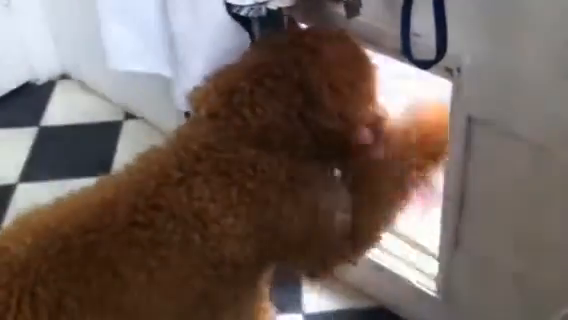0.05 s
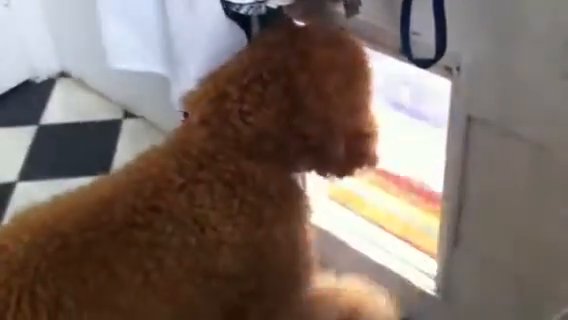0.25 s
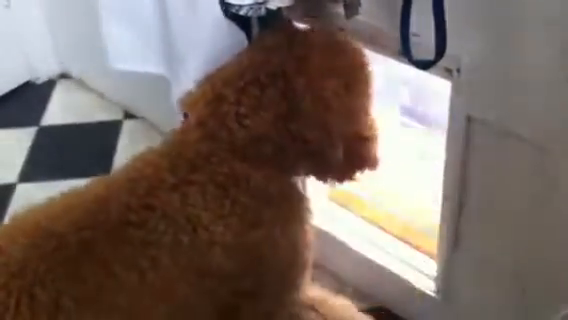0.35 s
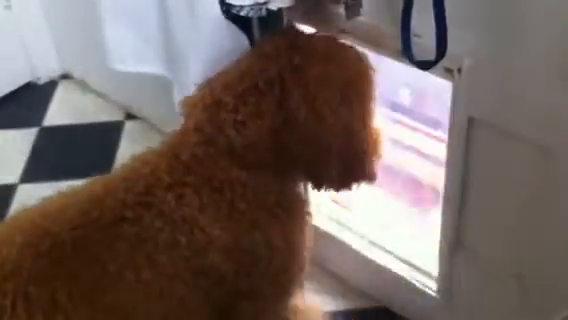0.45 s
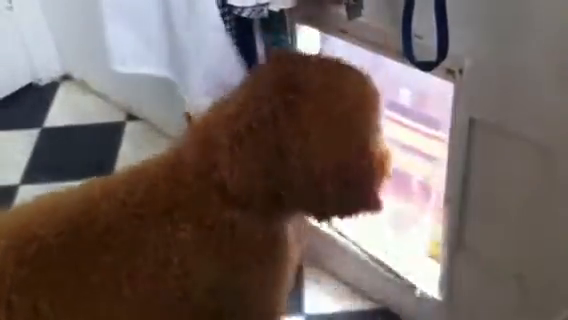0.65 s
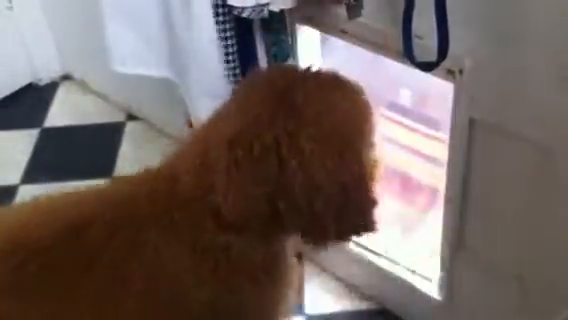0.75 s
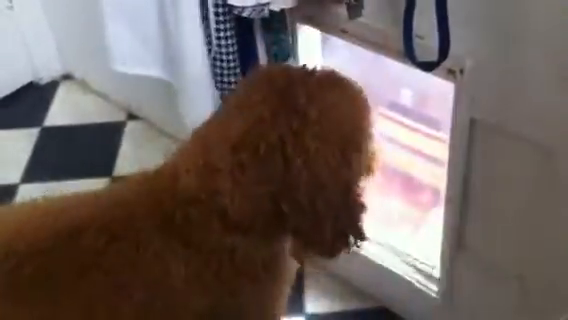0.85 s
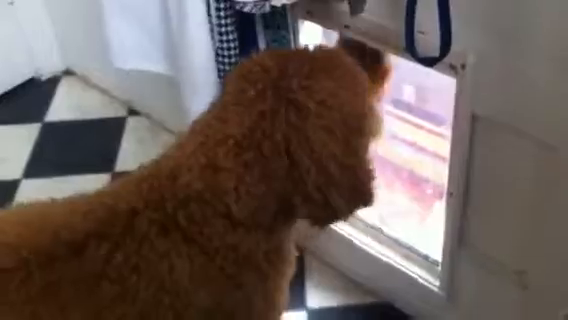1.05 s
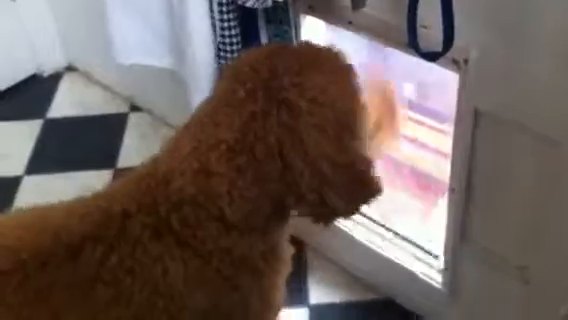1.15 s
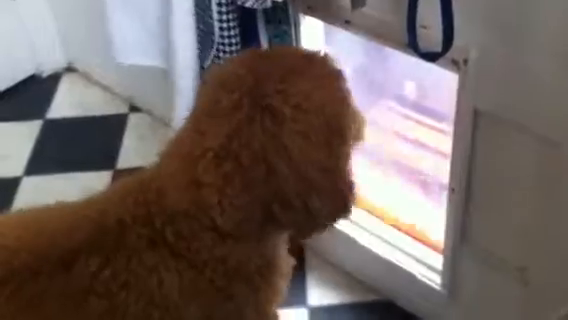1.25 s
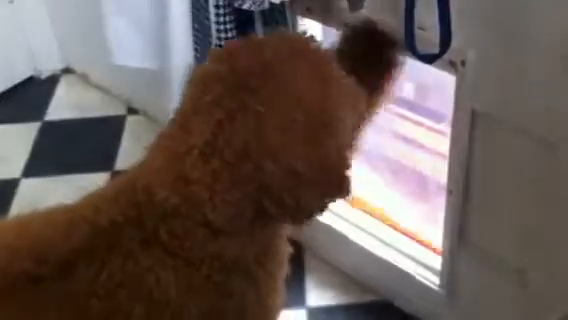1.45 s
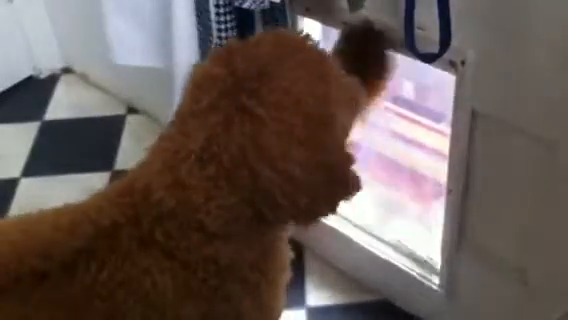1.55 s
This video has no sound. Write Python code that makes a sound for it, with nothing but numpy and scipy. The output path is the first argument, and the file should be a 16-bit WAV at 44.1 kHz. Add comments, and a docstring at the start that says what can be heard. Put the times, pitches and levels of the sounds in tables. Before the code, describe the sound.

A dog's paw strikes a plastic pet-door flap, close up in a small tiled room. Faint taps and scratching begin at once, a soft brush and clatter come near 0.2 s, and the sharpest clack at 0.35 s. After a pause, rattling clusters with claw drags follow at 0.63-0.8, 1.03-1.13 and 1.31-1.41 s, then a clack at 1.58 s. Faint low hum lies underneath.

```python
"""A plastic pet-door flap is pawed by a dog in a small, quiet, tiled room.
Each swipe is a cluster of knocks: the claws click, the flap clacks and rattles, its panel rings, the door thuds.
Clicks, clacks and rattles are short bursts of filtered noise; the panel and the door are fading sine waves.
Around the knocks the claws drag over the plastic (random ticks) and the furry paw brushes it (soft noise).
The room adds dense reflections, and steady noise with a faint hum of two sine waves lies underneath."""
import sys
import numpy as np
from scipy import signal
from scipy.fft import rfft, irfft
from scipy.io import wavfile
from scipy.ndimage import uniform_filter1d

SR = 44100
rng = np.random.default_rng(int(sys.argv[2]) if len(sys.argv) > 2 else 0)


def to_wav(sig):
    """Store sig (one row per channel, or 1-D mono) as 16-bit WAV at the path in sys.argv[1].

    Samples outside -1..1 are clipped; the rate is SR.
    """
    pcm = np.clip(np.atleast_2d(sig), -1, 1) * 32767
    pcm = np.round(pcm).astype(np.int16)
    wavfile.write(sys.argv[1], SR, pcm.T)  # frames by channels


N = 70560
T = np.arange(N) / SR


def from_db(db):
    """Turn decibels into a gain."""
    return 10 ** (np.asarray(db) / 20)


def unit(x):
    """Scale a sound so that its squared samples add up to one."""
    return x / np.sqrt(np.sum(x ** 2) + 1e-20)


def at_hz(points, hz):
    """Read between the points of a table, with frequency on a log scale."""
    point_hz, values = np.transpose(points)
    return np.interp(np.log(np.maximum(hz, 1)), np.log(point_hz), values)


def colour(x, points, even=False):
    """Filter by a table, without sound ahead of its cause; even also smooths out the input's own broad colour."""
    size = 2 * len(x)
    spectrum = rfft(x, size)
    gain = from_db(at_hz(points, np.fft.rfftfreq(size, 1 / SR)))
    if even:
        smooth_power = uniform_filter1d(np.abs(spectrum) ** 2, size=120)
        gain = gain / np.sqrt(smooth_power + 1e-12)
    # Folding the cepstrum gives the minimum-phase filter, which responds as early as it can
    cepstrum = irfft(np.log(gain))
    cepstrum[1:size // 2] *= 2
    cepstrum[size // 2 + 1:] = 0
    return irfft(spectrum * np.exp(rfft(cepstrum)))[:len(x)]


def add(out, start_s, x):
    """Mix x into out from a given time, cut off at the end."""
    i = max(int(start_s * SR), 0)
    out[i:i + len(x)] += x[:max(N - i, 0)]


def ring(modes, build_ms, spread_db=3.0, size=9000):
    """A struck object rings at several pitches (modes); each blow varies their strength and tuning."""
    hz, db, t60 = np.transpose(modes)[:, :, None]
    t = T[:size]
    strength = db + spread_db * rng.standard_normal(hz.shape)
    detune = 0.008  # typical fraction: the paw loads the flap differently at each blow
    hz = hz * (1 + detune * rng.standard_normal(hz.shape))
    waves = np.sin(2 * np.pi * (hz * t + rng.random(hz.shape)))
    fade = np.exp(-np.log(1000) * t / t60)  # down by 60 dB after t60
    modes_sum = (from_db(strength) * fade * waves).sum(0)
    build = 1 - np.exp(-t * 1000 / build_ms)  # the object takes up the blow gradually
    return unit(modes_sum * build)


def chatter(decay_ms, points, size=4096):
    """Hard plastic in contact: tiny impacts, made as a noise burst that dies in milliseconds."""
    rise_ms, shortest_ms = 0.47, 0.3
    t_ms = T[:size] * 1000
    fade = np.exp(-t_ms / max(decay_ms, shortest_ms))
    rise = 1 - np.exp(-t_ms / rise_ms)
    burst = rng.standard_normal(size) * fade * rise
    return unit(colour(burst, points, even=True))


def thin(x):
    """Take out the bass, since hard little contacts radiate none."""
    return signal.sosfilt(signal.butter(2, 940, "high", fs=SR, output="sos"), x)


def resonate(x, hz):
    """The spot that is struck favours one resonance, so lift a narrow band there."""
    lift_db, width_hz = 9.5, 160
    b, a = signal.iirpeak(hz, hz / width_hz, fs=SR)
    peak = signal.lfilter(b, a, x)
    return unit(x + (from_db(lift_db) - 1) * peak)


# Colour of the quiet room noise: (f/Hz, relative level/dB)
NOISE_COLOUR = [(25, -13), (60, -10.5), (130, 3.5), (220, 8), (350, 0), (600, -3.5), (1000, -9),
                (2500, -12), (5000, -17.5), (16000, -19.5)]
# Steady hum tones: (f/Hz, level/dB)
HUM_TONES = [(134, -80), (221, -70.5)]


def background():
    """Faint room noise is filtered random noise; the low hum is steady sine waves."""
    hum = 0
    for hz, db in HUM_TONES:
        tone = np.sin(2 * np.pi * (hz * T + rng.random()))
        hum = hum + from_db(db) * np.sqrt(2) * tone  # the root of 2 makes the level an RMS level
    noise_db = -65
    noise = unit(colour(rng.standard_normal(N), NOISE_COLOUR)) * np.sqrt(N)
    return hum + from_db(noise_db) * noise


# Ringing pitches of the door, before each blow varies them: (f/Hz, relative level/dB, time to fade by 60 dB t/s)
DOOR_MODES = [(55, -11, 0.025), (137.4, -4.5, 0.1), (175, -1, 0.055), (224.8, -4.5, 0.15),
              (290.6, 0.5, 0.14), (324, -2, 0.15), (370, 2.5, .06)]


def door_thud():
    """The door takes up the blow and rings low and briefly."""
    return ring(DOOR_MODES, build_ms=4.3)


# Ringing pitches of the plastic panel, likewise: (f/Hz, relative level/dB, time to fade by 60 dB t/s)
PANEL_MODES = [(480.6, -7.5, 0.12), (550.2, -3, 0.23), (589.4, 2.5, 0.097), (640, -3, .08),
               (714.3, -4, 0.25), (854, -9.5, .08), (1161.7, -0.5, 0.08), (1236, -14.5, 0.052),
               (1625, -6.5, .16), (1786, -5, 0.076), (1908, -7.5, 0.13), (2090, -6, .15)]


def panel_ring():
    """The plastic panel takes up the blow and rings at its own pitches."""
    return ring(PANEL_MODES, build_ms=3.4)


# Colour of the rattle: (f/Hz, relative level/dB)
RATTLE_COLOUR = [(250, -29.5), (550, 2), (850, -0.5), (980, -3.5), (1170, 0.5), (1450, -1), (1800, -7),
                 (2400, -32.5)]


def rattle(decay_ms):
    """The flap rattles: the lowest and longest chatter of a knock."""
    return chatter(decay_ms * 3.8, RATTLE_COLOUR)


# Colour of the clack before its resonance is lifted: (f/Hz, relative level/dB)
CLACK_COLOUR = [(1200, -26.5), (1700, -0.5), (2050, -0.5), (2350, 0.5), (2750, 0.5), (3150, 0),
                (3700, -4.5), (4500, -9), (6500, -27.5)]


def clack(decay_ms, hz):
    """The flap clacks in its frame: short chatter with the struck spot's resonance."""
    return thin(resonate(chatter(decay_ms * 1.2, CLACK_COLOUR), hz))


# Colour of the claw click: (f/Hz, relative level/dB)
CLICK_COLOUR = [(2800, -6.5), (4000, -2), (5200, -4.5), (6200, 1), (7300, -1.5), (9000, 3), (11000, -5),
                (13100, 1.5), (14500, -8.5), (16000, -2)]


def claw_click(decay_ms):
    """Hard claws hit the plastic: the brightest and shortest chatter."""
    return thin(chatter(decay_ms, CLICK_COLOUR))


# Knocks on the flap; each level is what the part's energy gives when spread over 5 ms, before thinning.
# The decay is a base time, stretched for clack and rattle.
# (t/s, base chatter decay t/ms, door thud level/dB, panel ring level/dB, rattle level/dB,
#  clack level/dB, clack resonance f/Hz, claw click level/dB)
FLAP_KNOCKS = [ (0.0366, 4.7, -55, -55.5, -45.5, -41.5, 2510, -49.5),
               (.0657, 3.1, -44.5, -50, -45.5, -47, 2540, -46.5),
               (.0720, 5.6, -46, -74, -55, -54, 3100, -46), (0.081, 2.3, -65, -46.5, -53.5, -51, 2680, -52),
               (.1230, 5.1, -44.5, -48, -53.5, -50.5, 3100, -58),
               (.2150, 8.5, -58, -37, -33, -34.5, 2410, -47),
               (.2182, 2.4, -64, -34, -32.5, -35.5, 2720, -34.5),
               (.2370, 4.0, -50, -67, -57, -40.5, 2950, -46), (0.2571, 2.0, -54, -43, -45, -65, 2500, -60),
               (0.3229, 2.5, -49, -40.5, -39.5, -31.5, 2790, -41.5),
               (0.3462, 4.7, -48, -41, -34.5, -24, 2010, -14),
               (0.3564, 0.71, -53, -51.5, -45, -28, 2080, -26.5),
               (0.627, 10, -59, -56, -63, -50.5, 2480, -96),
               (0.6444, 4.5, -45, -52.5, -44.5, -43, 2860, -42),
               (0.656, 9, -45, -38.5, -41, -35, 2690, -73),
               (0.6657, 7.8, -38.5, -50, -38, -28, 1790, -22.5),
               (.6730, 4.9, -36.5, -31.5, -32.5, -31, 3260, -31.5),
               (0.6997, 2.0, -39, -45, -42.5, -43, 1800, -51),
               (.7472, 8.4, -55.5, -48.5, -45, -39.5, 2000, -50),
               (0.785, 2.0, -57, -36, -39.5, -37, 2944, -41), (1.028, 6.0, -53, -54, -39, -45, 2620, -45.5),
               (1.0452, 4.1, -47.5, -44.5, -36.5, -28.5, 3110, -27.5),
               (1.0590, 5.6, -48, -33.5, -42.5, -36.5, 1800, -44),
               (1.0827, 2.5, -51.5, -43, -45, -40, 3600, -40),
               (1.0885, 2.7, -41, -32.5, -64, -42.5, 2390, -34.5),
               (1.0985, 1.6, -58, -45, -49.5, -46, 1810, -45),
               (1.1082, 1.7, -42.5, -36, -39, -47.5, 1800, -58),
               (1.126, 2.9, -46, -48.5, -39.5, -36, 2204, -46.5),
               (1.3146, 2.8, -45.5, -43.5, -44, -37, 2980, -39.5),
               (1.3358, 3.0, -50.5, -40.5, -43, -39.5, 2490, -51),
               (1.3460, 3.5, -54.5, -35.5, -39.5, -36.5, 2440, -46.5),
               (1.3820, 1.8, -51, -36.5, -35.5, -36, 2540, -44.5),
               (1.41, 2.3, -53, -46, -41.5, -44.5, 2600, -59.5),
               (1.5700, 20, -60.5, -70, -52, -39.5, 2160, -49),
               (1.5798, 5, -47.5, -65, -45, -32, 3070, -35)]


def knocks():
    """Each blow makes a click, a clack and a rattle, and sets the panel and the door ringing."""
    out = np.zeros(N)
    for start_s, decay_ms, thud_db, ring_db, rattle_db, clack_db, clack_hz, click_db in FLAP_KNOCKS:
        add(out, start_s, from_db(thud_db) * door_thud())
        add(out, start_s, from_db(ring_db) * panel_ring())
        add(out, start_s, from_db(rattle_db) * rattle(decay_ms))
        add(out, start_s, from_db(clack_db) * clack(decay_ms, clack_hz))
        add(out, start_s, from_db(click_db) * claw_click(decay_ms))
    level_window_s = 0.005
    return out * np.sqrt(level_window_s * SR)


# How long the reflections last: (f/Hz, time to fade by 60 dB t/s)
ROOM_FADE = [(120, 1), (300, 0.28), (700, 0.4), (2000, 0.26), (6000, 0.32), (10000, 0.17), (15000, .21)]


def room(x, size=22050):
    """Dense reflections, even in colour, build up quickly and die band by band."""
    level_db, delay_s, build_s = -6.5, 0.0022, 0.00046
    t, hz = T[:size], np.fft.rfftfreq(size, 1 / SR)
    white = rfft(rng.standard_normal(size))
    build = np.clip((t - delay_s) / build_s, 0, 1)
    edges = np.geomspace(40, SR / 2, 19)
    tail = 0
    for low, high in zip(edges, edges[1:]):
        band = irfft(white * ((hz >= low) & (hz < high)), size)
        decay = np.exp(-np.log(1000) * t / at_hz(ROOM_FADE, np.sqrt(low * high)))
        tail = tail + unit(band * build * decay) * np.sqrt(2 * (high - low) / SR)
    # Level out the tail's colour, then shape its start once more
    spectrum = rfft(tail, 2 * size)
    smooth_power = uniform_filter1d(np.abs(spectrum) ** 2, size=70)
    even = irfft(spectrum / np.sqrt(smooth_power + 1e-2))[:size]
    return from_db(level_db) * signal.fftconvolve(x, unit(even * build))[:N]


# Colour of the claw drags: (f/Hz, relative level/dB)
DRAG_COLOUR = [(150, -21), (300, 8.5), (600, 16), (1000, 3), (2700, -10), (4500, 4.5), (9000, -17),
               (16000, -20)]
# Claws drag over the flap: (start t/s, length t/s, level at full pressure/dB)
CLAW_DRAGS = [(0.055, 0.09, -50.5), (0.227, 0.05, -50.5), (0.679, 0.082, -46), (1.032, 0.079, -40.5),
              (1.094, 0.062, -44), (1.31, 0.095, -49.5)]


def drags():
    """Claws stick and slip on the panel in a dense, uneven run of ticks."""
    slips_per_s, spread_db = 600, 3.5
    happens = rng.random(N) < slips_per_s / SR
    direction = rng.choice([-1, 1], N)
    strength = from_db(spread_db * np.minimum(rng.exponential(1, N), 3))
    slips = happens * direction * strength
    pressure = 0
    for start_s, length_s, db in CLAW_DRAGS:
        progress = np.clip((T - start_s) / length_s, 0, 1)
        pressure = pressure + from_db(db) * np.sqrt(np.abs(np.sin(np.pi * progress)))
    return pressure * unit(colour(slips, DRAG_COLOUR)) * np.sqrt(N)


# Colour of the paw brushing: (f/Hz, relative level/dB)
BRUSH_COLOUR = [(1000, -4), (3000, -0.5), (5000, -8), (8700, 1), (11000, -5.5), (13500, -5), (16000, -4.5)]
# The furry paw brushes the flap: (peak t/s, rise t/s, fall t/s, peak level/dB)
PAW_BRUSHES = [(0.203, 0.077, 0.038, -49.5), (.249, .02, 0.011, -41), (1.288, 0.063, 0.01, -62)]


def brushes():
    """Fur and pads slide with a soft hiss that swells and stops."""
    speed = 0
    for peak_s, rise_s, fall_s, db in PAW_BRUSHES:
        swell = np.interp(T, [peak_s - rise_s, peak_s, peak_s + fall_s], [0, 1, 0])
        speed = speed + from_db(db) * swell
    return speed * unit(colour(rng.standard_normal(N), BRUSH_COLOUR)) * np.sqrt(N)


def scene(count=3):
    """The flap radiates differently in each direction: the first reaches the microphone, all fill the room."""
    sliding = drags() + brushes()
    directions = [knocks() + sliding for _ in range(count)]  # same knock times, fresh random detail
    reflections = sum(room(x) for x in directions) / np.sqrt(count)
    return (directions[0] + reflections + background())[None]


def record(dry):
    """Cut the top steeply above 15750 Hz with a low-pass filter."""
    return signal.sosfilt(signal.ellip(10, .1, 70, 15750, fs=SR, output="sos"), dry)


dry = scene()
out = record(dry)
to_wav(out)
```